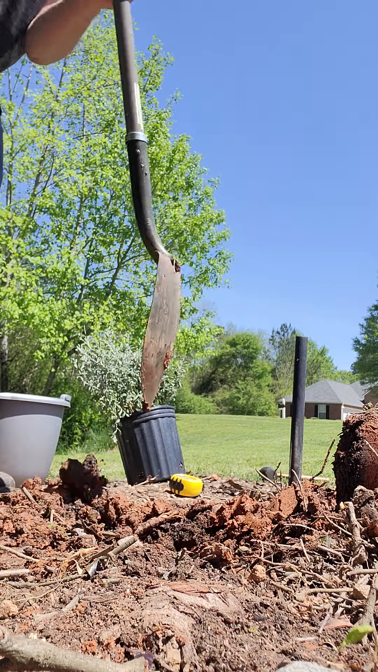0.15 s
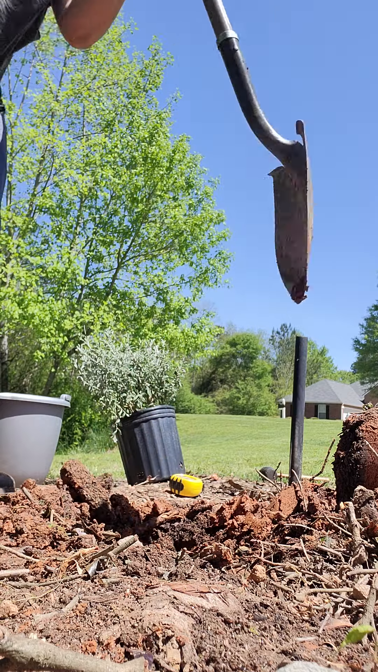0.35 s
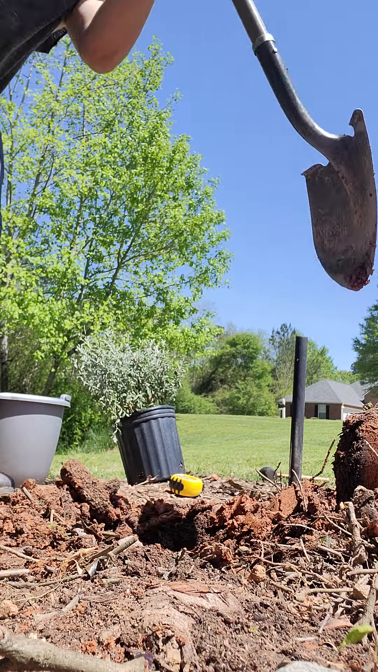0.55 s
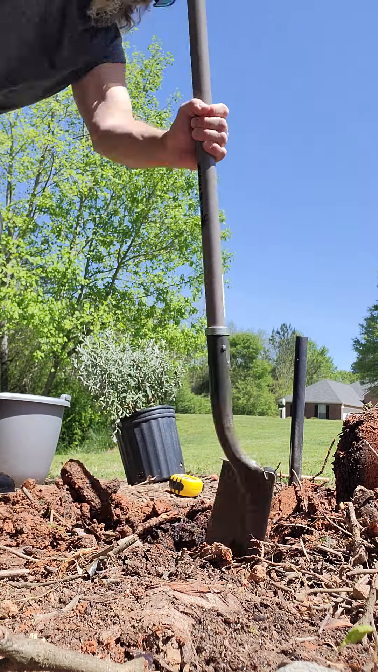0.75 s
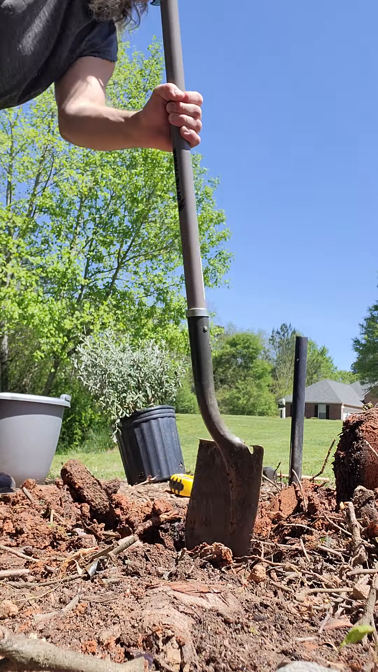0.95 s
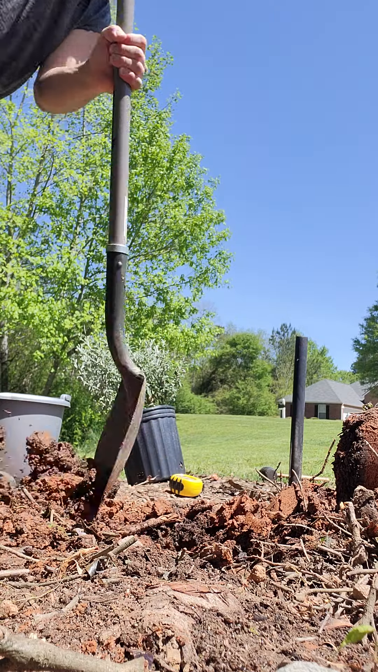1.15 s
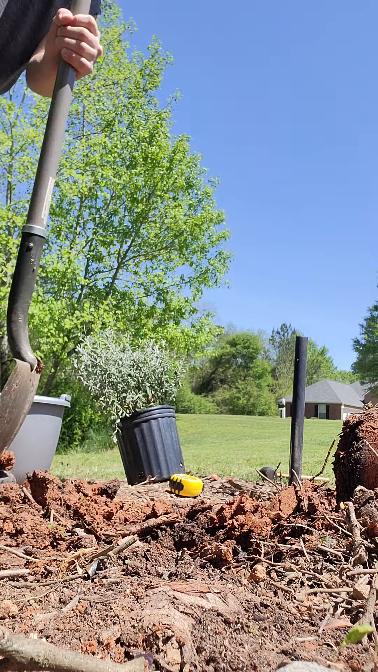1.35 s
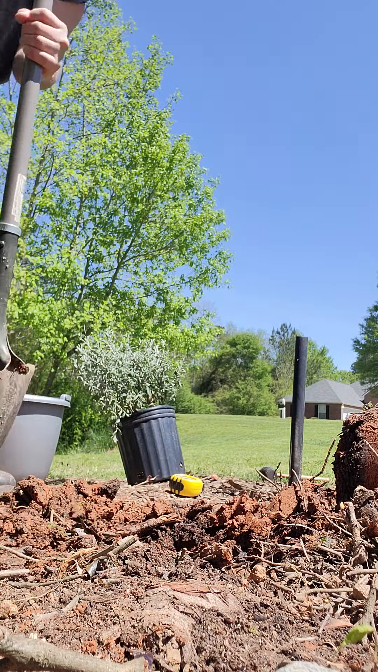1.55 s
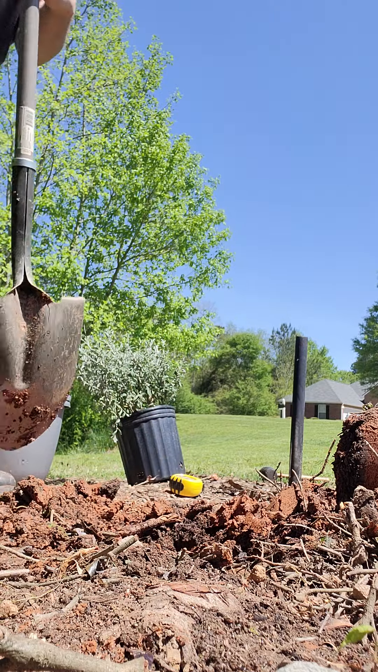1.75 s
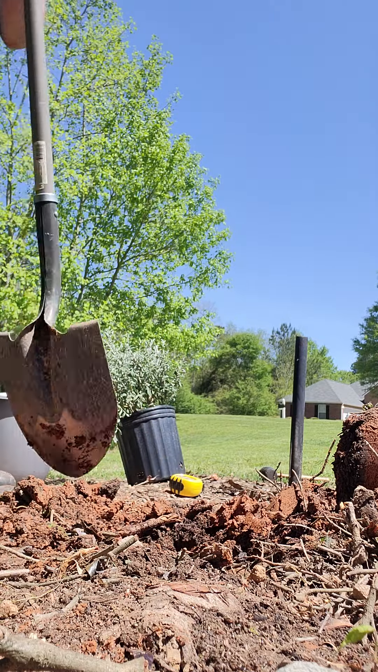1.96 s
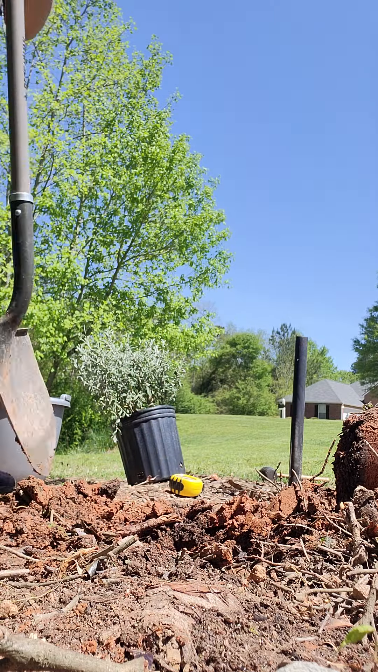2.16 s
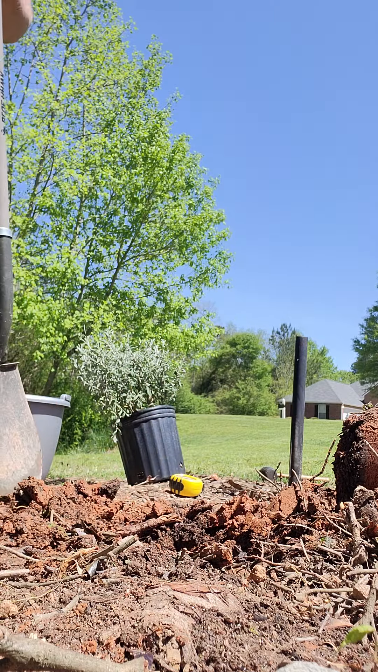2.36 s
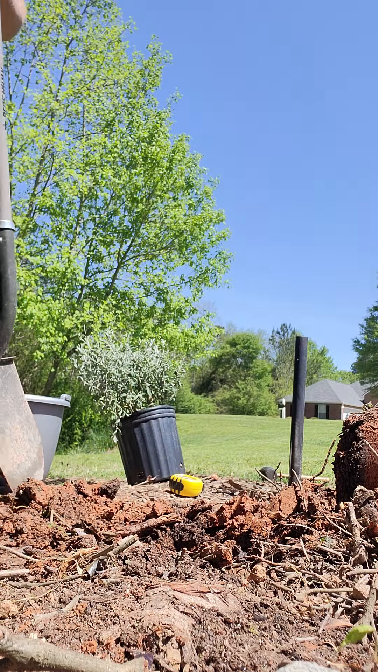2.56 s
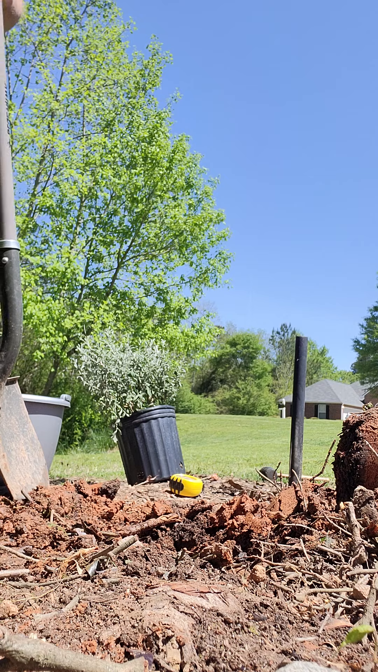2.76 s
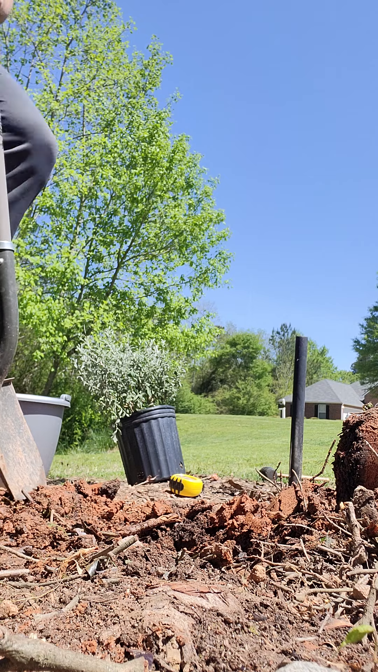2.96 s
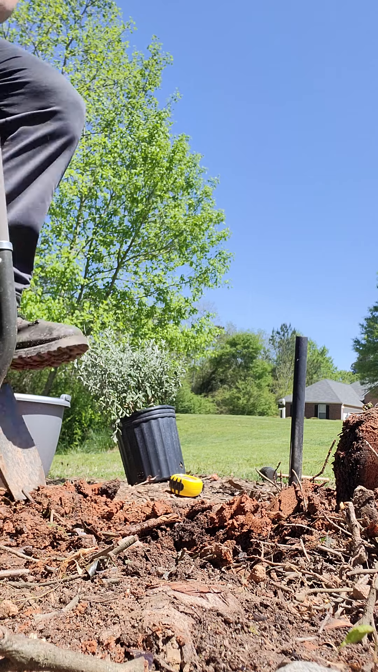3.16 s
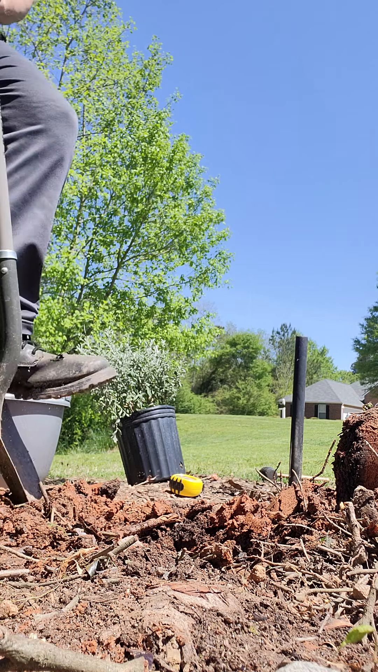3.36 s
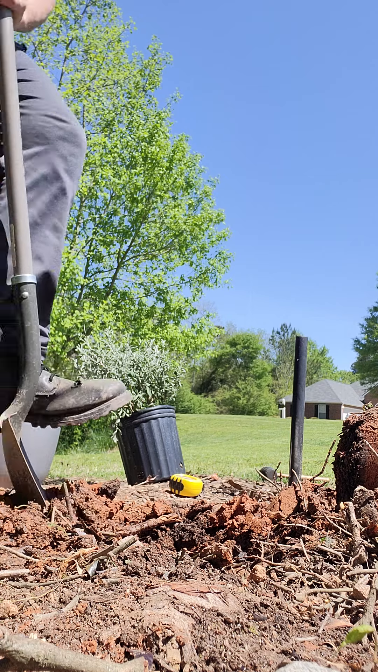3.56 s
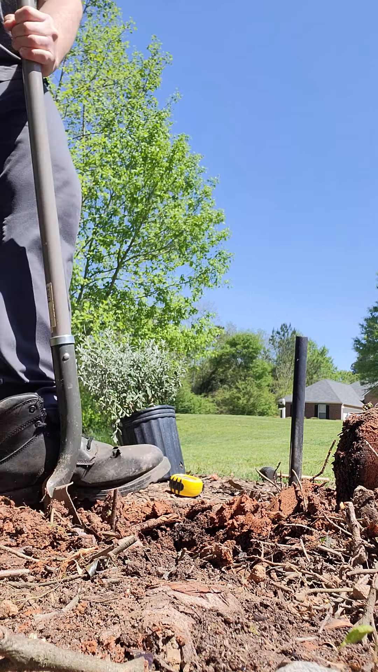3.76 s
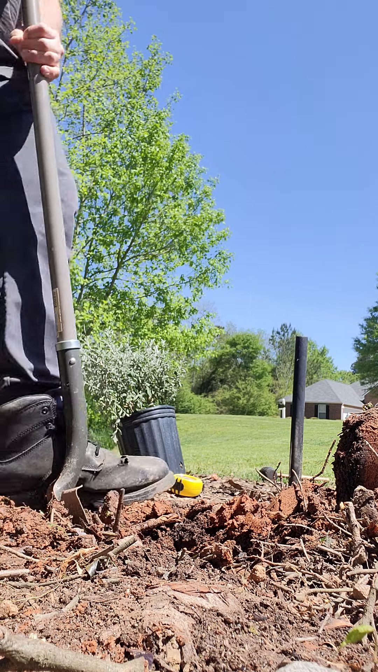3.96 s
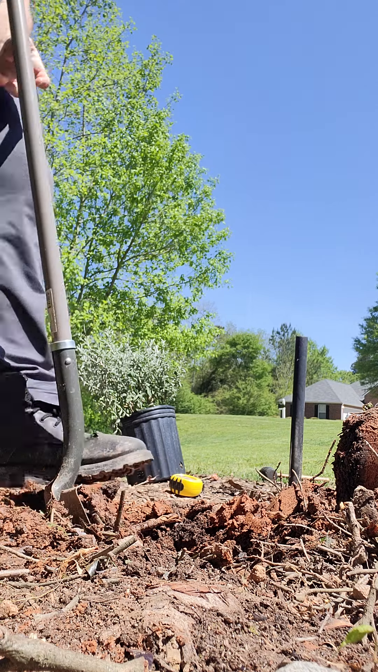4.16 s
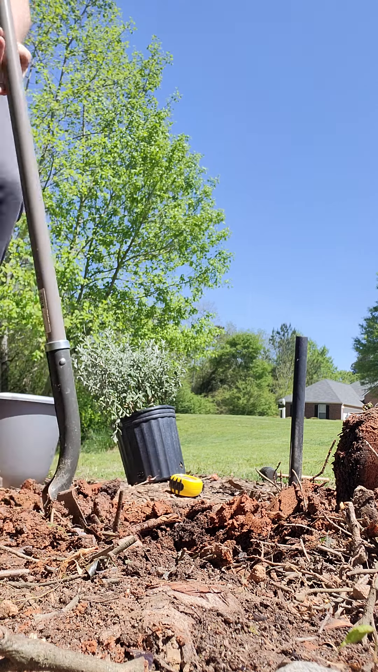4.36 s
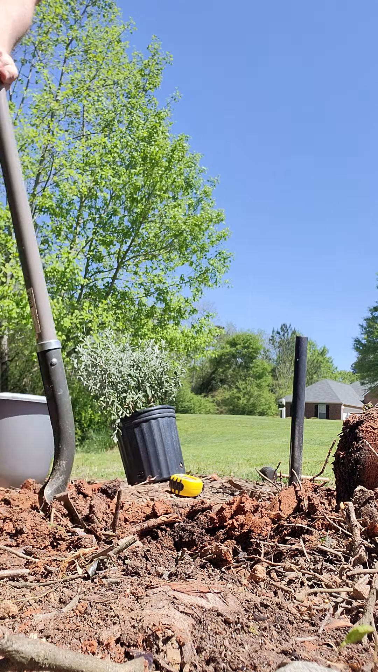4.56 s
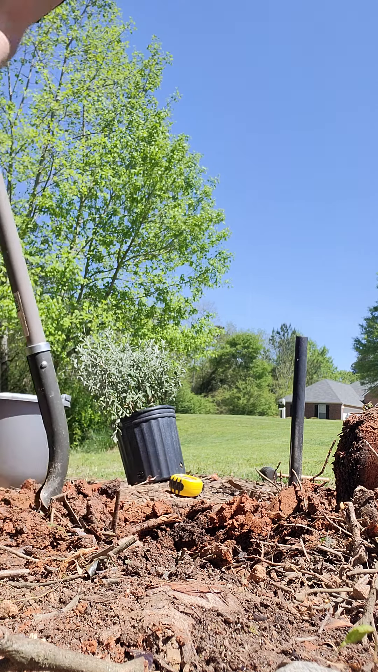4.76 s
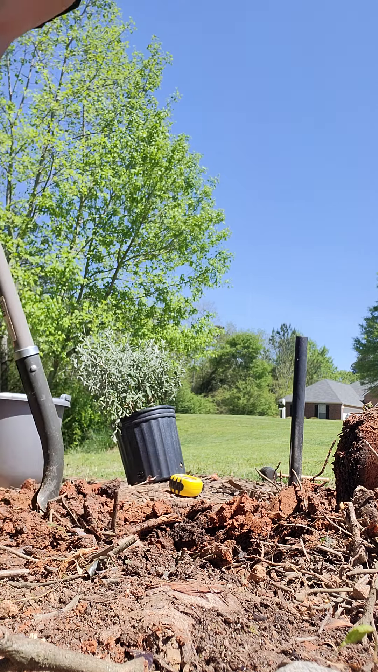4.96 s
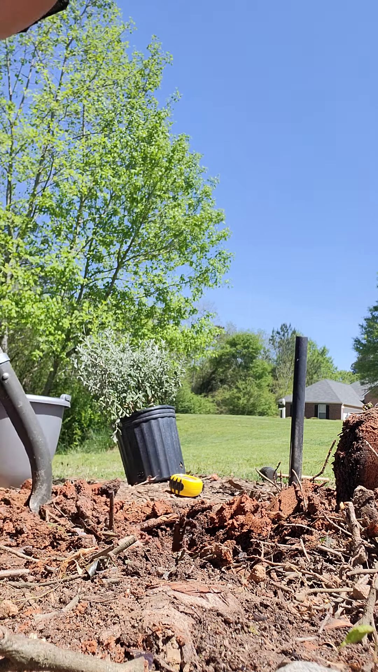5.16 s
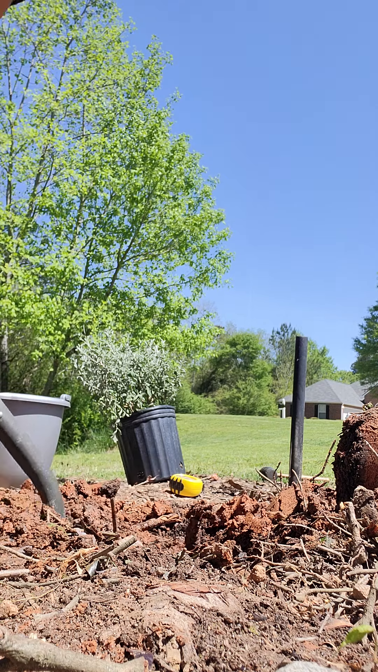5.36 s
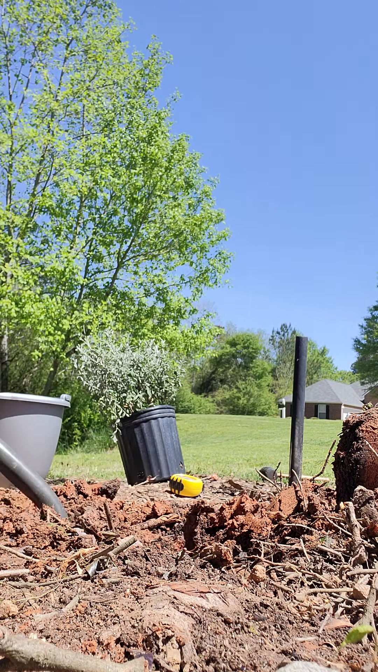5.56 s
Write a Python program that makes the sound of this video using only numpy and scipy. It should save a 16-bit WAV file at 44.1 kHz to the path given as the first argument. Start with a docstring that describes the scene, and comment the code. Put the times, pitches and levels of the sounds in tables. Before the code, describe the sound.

Close, dry, wide stereo digging in an open garden with only a faint outdoor tail. A steady low hum of two distant engines, slowly wavering in pitch and loudness, lies under a soft rumble and very faint leaf hiss. Thin V-shaped bird chirps near 8 kHz recur throughout. Only a faint slide at 0.25 s precedes the loudest event, at about 0.66-0.70 s: a steel spade stabs wet clay with a sharp gritty clank and short thump. Gritty scraping fades to 1.5 s, with a cut and crumble near 1.3 and a snap at 1.5. Soft slides and light edge ticks follow around 1.8-2.6. At 3.2 the blade lands with a dull knock; from 3.46 it is trodden in with a rising scrape, crunch and double thud near 3.7, then two snaps around 3.8. From 4.3 to 5.5 roots crackle and pop irregularly, ending in clustered soft clod knocks at about 5.55.

```python
"""Spade in wet clay, open garden

Close to the two microphone ports, a steel spade is stabbed into wet, gritty clay, lifts a clod,
is set down again, trodden in and levered back through roots. Random grit clicks excite the blade's modes,
filtered grains and damped sines make the clods crumble and knock, noise bursts make the rootlets snap.
Far off, two engines hum as sine tones over shaped noise, and a small bird chirps in gliding sines near 8 kHz."""
import sys
import numpy as np
from scipy import signal
from scipy.fft import rfft, irfft, next_fast_len
from scipy.io import wavfile

SR = 44100
rng = np.random.default_rng(int(sys.argv[2]) if len(sys.argv) > 2 else 0)


def dump(signal):
    """Clip the signal to [-1, 1] and save it as 16-bit WAV at the path in sys.argv[1]."""
    limited = np.clip(np.atleast_2d(signal).T, -1, 1)
    pcm = np.round(limited * 32767).astype(np.int16)
    wavfile.write(sys.argv[1], SR, pcm)


N = 248233
TIME = np.arange(N) / SR
SIZE = 2 * next_fast_len(N // 2 + SR // 2)  # padded length for filtering
FREQS = np.maximum(np.fft.rfftfreq(SIZE, 1 / SR), 1)
CUTOFF_HZ = 16200  # top of the microphone's range

# Levels in the tables are relative: each source has its own trims, and the microphone colours the sum.

# soil sliding over the blade:
# (time [s], length [s], final level [dB], swell [dB], treble lift [dB])
SOIL_SLIDES = [(.25, 0.082, -64.5, 5, -1), (.70, 0.016, -40, -5.5, -11.5), (.85, 0.19, -41.5, 17.5, -1.5),
               (1.15, 0.32, -54, 7, -9), (1.505, 0.077, -48, 2, -7), (1.77, .16, -56, 11.5, 3),
               (2.418, .03, -53.5, 4, -6), (3.23, 0.33, -49.5, 11, 3.5), (3.46, .24, -34, 9, 3.5),
               (3.78, 0.091, -54.5, -12.5, 5), (3.98, 0.13, -52, 11.5, -0.5)]
# quick cuts of the blade's edge:
# (time [s], length [s], final level [dB], swell [dB], treble lift [dB])
EDGE_CUTS = [(.657, 0.024, -21.5, 15, -12), (.687, 0.0075, -13.5, 0.5, -12), (1.272, 0.015, -47, 8, 4),
             (1.345, 0.053, -32.5, 30, 6.5), (2.243, 0.05, -41, -10.5, 3), (2.582, 0.048, -39.5, -8, 2.5),
             (3.212, 0.043, -38.5, 3, -3), (3.4645, .003, -31.5, -9, -1), (3.602, 0.0067, -31.5, 14, 7),
             (3.648, .03, -32.5, -7, -4)]
# ringing of the blade, damped by the soil: (frequency [Hz], width [Hz], level [dB])
BLADE_MODES = [(1760, 95, 0), (2305, 130, -2), (2820, 18, -10.5), (3160, 52, 2), (3350, 94, 5),
               (3770, 81.5, -6.5), (4220, 430, 1), (4820, 84, 7), (5100, 150, 2.5), (5980, 31, -13),
               (6700, 21, -13.5), (7370, 66, -22), (12300, 82, -15.5)]
# colour of grit on steel: (frequency [Hz], level [dB])
GRIT_COLOUR = [(200, -21.5), (700, 8), (1400, -5), (2200, -1), (3500, -4), (5600, -4), (7500, 1.5),
               (10000, 1), (13000, 1), (16000, -11.5)]


def blade_scrape(ring_db=1.5, slide_t60=0.19, cut_t60=0.038, treble_hz=8000, treble_db=0.5,
                 slide_db=-1.5, cut_db=-2.0, pebble_db=-5.5):
    """Grit cracks against the steel: heard directly and through the blade's modes, with a treble of its own."""
    slide, slide_treble = pushes(SOIL_SLIDES, slide_t60)
    cut, cut_treble = pushes(EDGE_CUTS, cut_t60)
    coarse = from_db(pebble_db) * pebbles()

    slide_grit = grains(per_s=4000, spread_db=4.5, clump_db=4.5, clump_hz=71)
    sliding = from_db(slide_db) * shifting(slide_grit + coarse, depth=0.12, rate_hz=28)
    # a fast edge meets more grit
    cut_grit = grains(per_s=18000, spread_db=1.5, clump_db=1.5, clump_hz=200)
    cutting = from_db(cut_db) * shifting(cut_grit + coarse, depth=.25, rate_hz=51)

    body = sliding * slide + cutting * cut
    treble = sliding * slide_treble + cutting * cut_treble

    modes = sum(from_db(db + ring_db) / (1 + 2j * (FREQS - hz) / width) for hz, width, db in BLADE_MODES)
    steel = unit_band(causal(GRIT_COLOUR) * (1 + modes))
    high = 1 / (1 + (treble_hz / FREQS) ** 4)
    return through(body, steel * (1 - high)) + from_db(treble_db) * through(treble, steel * high)


def pushes(rows, t60):
    """Summed envelopes of a table of strokes: for the body of the sound, and for its treble."""
    body_power = treble_power = 0
    for s, length, db, swell_db, lift_db in rows:
        power = stroke(s, length, db, swell_db, t60) ** 2
        body_power = body_power + power
        treble_power = treble_power + power * from_db(lift_db) ** 2
    return np.sqrt(body_power), np.sqrt(treble_power)


def stroke(start, length, db, swell_db, t60, bite_share=0.14):
    """Envelope of one push: a quick bite, a steady swell or easing to its final level, a release."""
    envelope = np.zeros(N)
    sounding = slice(int(start * SR) + 1, int((start + length + 2 * t60) * SR))
    age = TIME[sounding] - start
    swell = swell_db * np.maximum(1 - age / length, 0)
    release = 60 * np.maximum(age - length, 0) / t60
    bite = np.minimum(age / (bite_share * length), 1)
    envelope[sounding] = bite * from_db(db - swell - release)
    return envelope


def grains(per_s, spread_db, clump_db, clump_hz, ground_db=6.0, ground_s=0.0045):
    """Random tiny stick-slip fractures in clumps, plus a scatter off rough ground unlike at each port."""
    clumps = from_db(clump_db * np.clip(drift(clump_hz), -1.5, 1.5))
    clicks = random_clicks(per_s, spread_db) * clumps
    # the scatter is noise that follows the recent power of the clicks
    keep = np.exp(-1 / (ground_s * SR))
    recent_power = signal.lfilter([1 - keep], [1, -keep], clicks ** 2 + 1e-18)
    scattered = np.sqrt(recent_power) * rng.standard_normal((2, N))
    return rms_one(off_centre(clicks) + from_db(ground_db) * scattered)


def pebbles(per_s=110, cycles=3, spread_db=1.5, count=14):
    """Coarse grains tick at random, each size class as a short resonance at its own pitch; unit power."""
    out = 0
    for hz in np.geomspace(1600, 14000, count):
        radius, angle = np.exp(-hz / (cycles * SR)), 2 * np.pi * hz / SR
        resonance = [1, -2 * radius * np.cos(angle), radius * radius]
        ticks = random_clicks(per_s, spread_db) + 1e-18
        out = out + signal.lfilter([np.sin(angle) * hz / SR], resonance, ticks)
    return off_centre(rms_one(out))


def random_clicks(per_s, spread_db):
    """Single-sample clicks of random moment, size and sign."""
    sizes = from_db(spread_db * np.minimum(rng.exponential(1, N), 3)) * rng.choice([-1, 1], N)
    return (rng.random(N) < per_s / SR) * sizes


def shifting(x, depth, rate_hz, count=4):
    """The colour wanders as the contact moves: very short reflections fade in and out at random."""
    lags = (rng.uniform(.0002, .002, count) * SR).astype(int)
    reflections = sum(drift(rate_hz) * np.roll(x, lag, axis=-1) for lag in lags)
    return rms_one(x + depth * reflections)


# pulls on the handle that lever the spade back through the roots:
# (time [s], length [s], final crackle level [dB], swell [dB])
ROOT_PULLS = [(4.328, 0.5, -60.5, -3), (4.955, 0.24, -51.5, 10.5), (5.225, 0.071, -42.5, 1),
              (5.311, .19, -41, 9), (5.544, 0.067, -46.5, -8)]
# the thicker rootlets snapping: (time [s], level [dB], body level [dB], pitch [Hz])
ROOTLET_SNAPS = [(1.202, -43, 1, 3330), (1.519, -30.5, -5, 4400), (3.1832, -40.5, -6, 1717),
                 (3.7836, -26, 0, 6700), (3.8336, -26.5, -0.5, 1690), (4.3302, -29.5, 4, 4516),
                 (4.512, -24.5, 0, 4700), (4.612, -41.5, 6.5, 1680), (4.7463, -35, -12, 3300),
                 (4.791, -27, 5.5, 1820), (4.9562, -36.5, 1.5, 2190), (4.9892, -33.5, 1.5, 2180),
                 (5.035, -33.5, 2.5, 1870), (5.153, -33, 6, 3150), (5.2252, -35, 4, 3600),
                 (5.417, -24, -28, 6400), (5.4886, -27, 4, 3250)]
# colour of tearing fibres: (frequency [Hz], level [dB])
TEAR_COLOUR = [(200, -6), (700, 6), (1500, 3), (2500, 2), (4200, -3), (6000, -4.5), (9000, -2),
               (12000, -2.5), (16000, -13)]
# colour of the crack of a snap: (frequency [Hz], level [dB])
CRACK_COLOUR = [(1500, -21), (4000, 1.5), (7000, -1), (12000, 3), (16000, -6.5)]
# colour of the body of a snap: (frequency [Hz], level [dB])
BODY_COLOUR = [(200, 8), (1200, 4), (2500, -2), (4200, 5), (7000, -6.5), (16000, -62.5)]


def roots(tear_db=0.5, snap_db=-4.0, twang_db=-7.5, pull_t60=0.1):
    """Fibres tear in a lumpy crackle; rootlets part with a snap, each with its own body and a brief pitch."""
    pull = sum(stroke(s, length, db + tear_db, swell_db, pull_t60) for s, length, db, swell_db in ROOT_PULLS)
    fibres = grains(per_s=3500, spread_db=6, clump_db=4.5, clump_hz=80)
    tear = pull * shifting(fibres, depth=0.26, rate_hz=18)

    splinters = grains(per_s=20000, spread_db=1, clump_db=0, clump_hz=400)
    crack = body = twang = 0
    for s, db, body_db, hz in ROOTLET_SNAPS + fine_snaps():
        parting = from_db(db + snap_db) * snap(s)
        crack = crack + parting
        body = body + from_db(body_db) * parting
        twang = twang + from_db(db + body_db + twang_db) * swing(s, hz, 0.019)

    tearing = through(tear, unit_band(causal(TEAR_COLOUR)))
    cracking = through(splinters * crack, causal(CRACK_COLOUR))
    thickness = through(splinters * body, causal(BODY_COLOUR))
    return tearing + cracking + thickness + off_centre(twang)


def fine_snaps(per_pull=3, level_db=-46.5, spread_db=7, body_db=-10, centre_hz=2320):
    """Thin rootlets part at random moments of each pull; rows like those of the thicker ones."""
    rows = []
    for s, length, _, _ in ROOT_PULLS:
        for when, size, pitch in rng.random(size=(per_pull, 3)):
            db = level_db + spread_db * (2 * size - 1)
            hz = centre_hz * 2 ** (pitch - .5)  # within half an octave either way
            rows.append((s + length * when, db, body_db, hz))
    return rows


def snap(start, build_s=0.0014, hold_s=0.0012, t60=0.025):
    """Envelope of a parting rootlet: the first fibres give, the rest follow at once, and the sound dies."""
    envelope = burst(start - build_s, build_s + hold_s, t60)
    building = slice(int((start - build_s) * SR), int(start * SR))
    envelope[building] *= (1 - (start - TIME[building]) / build_s) ** 2
    return envelope


# clay crumbling, low where it is packed and high where it is loose:
# (time [s], level [dB], length [s], pitch [Hz])
CLAY_CRUNCHES = [(0.688, -20, 0.012, 1500), (0.704, -46, 0.036, 2200), (1.351, -45.5, 0.039, 2900),
                 (1.383, -41, 0.016, 2450), (2.256, -61, 0.044, 2750), (3.601, -37, 0.035, 810),
                 (3.663, -29.5, 0.017, 1110), (3.69, -29.5, 0.041, 766), (3.778, -37, .025, 780),
                 (5.223, -39, 0.035, 516), (5.231, -41, 0.063, 2010), (5.338, -44.5, 0.092, 428),
                 (5.417, -37.5, 0.079, 476), (5.543, -31.5, 0.07, 460)]
# dull blows of blade, boot and clods: (time [s], level [dB], pitch [Hz], fall by 60 dB [s])
DULL_BLOWS = [(.661, -14, 504, 0.0067), (.689, -12, 1124, 0.015), (.694, -17.5, 209, 0.061),
              (0.696, -14, 78.6, 0.079), (3.200, -20, 644, 0.029), (3.204, -24.5, 241, 0.088),
              (3.698, -16, 826, 0.031), (3.716, -13.5, 730, 0.025), (5.554, -17, 517, 0.02),
              (5.561, -14, 593, 0.02), (5.577, -18.5, 620, 0.017), (5.592, -22.5, 264, 0.031)]


def clay(crunch_db=0.0, thud_db=0.0, crumble=0.33, spread=1.434):
    """Wet lumps crumble in soft grains around one pitch; each blow is a short, rough, heavily damped swing."""
    crumbs = grains(per_s=2700, spread_db=0.5, clump_db=6.0, clump_hz=90.2, ground_db=-3.5)
    crunching = 0
    for s, db, length, hz in CLAY_CRUNCHES:
        low, high = hz / spread, min(hz * spread, CUTOFF_HZ)
        lump = signal.butter(2, [low, high], "band", fs=SR, output="sos")
        # a narrow band passes less power, so it is raised
        gain = from_db(db + crunch_db) * np.sqrt(SR / 2 / (high - low))
        crunching = crunching + signal.sosfilt(lump, crumbs * (gain * burst(s, length, 0.041) + 1e-12))
    blows = sum(from_db(db + thud_db) * swing(s, hz, t60) for s, db, hz, t60 in DULL_BLOWS)
    return crunching + off_centre(blows * (1 + crumble * drift(900)))


def swing(start, hz, t60):
    """A damped sine set off by a blow."""
    out = burst(start, 0, t60)
    sounding = out > 0
    out[sounding] *= np.sin(2 * np.pi * hz * (start - TIME[sounding]))
    return out


def burst(start, length, t60):
    """Envelope that holds for a moment and dies away."""
    envelope = np.zeros(N)
    sounding = slice(int(start * SR), int((start + length + 2 * t60) * SR))
    envelope[sounding] = from_db(-60 * np.maximum(TIME[sounding] - start - length, 0) / t60)
    return envelope


def off_centre(x, lag=13):
    """The spade works to one side, so the left port hears it a little later (lag in samples)."""
    return np.array([np.pad(x, (lag, 0))[:N], x])


# bird calls: (time [s], level [dB], pitch at the bottom of the dip [Hz])
BIRD_CALLS = [(-.02, -48.5, 7600), (0.244, -49.5, 8280), (.37, -59.5, 8100), (0.591, -59, 8450),
              (0.841, -52, 7970), (1.091, -53, 8400), (1.226, -53.5, 7970), (1.865, -55, 8640),
              (2.0, -49, 8094), (2.35, -62, 8280), (2.715, -45, 8287), (2.949, -47.5, 8270),
              (3.075, -45, 7930), (3.885, -46, 8160), (4.308, -56, 8404), (4.449, -59, 8300),
              (4.54, -47.5, 8740), (4.67, -47.5, 8200), (5.019, -62, 8350), (5.165, -53, 8140)]


def bird(start_hz=8800, fall_s=0.011, rise_s=0.045, overshoot=0.72, warble_hz=70,
         direct_db=-7.5, leaves_db=6.0, pan_db=1.0):
    """Thin V-shaped whistles, smeared by the foliage; the deeper the dip, the higher the call ends."""
    pitch, level = np.full(N, float(start_hz)), np.zeros(N)
    for s, db, bottom_hz in BIRD_CALLS:
        turns = [s, s + fall_s, s + fall_s + rise_s]
        end_hz = start_hz + overshoot * (start_hz - bottom_hz)
        glide = np.interp(TIME, turns, [start_hz, bottom_hz, end_hz])
        pitch = np.where(TIME >= s, glide, pitch)
        level += from_db(db) * np.interp(TIME, turns, [0, 1, 0])
    song = level * np.sin(2 * np.pi * np.cumsum(pitch + warble_hz * drift(300)) / SR)
    smeared = scatter(song, t60=0.2, delay=0.0018, dull_hz=14970)
    return (from_db(direct_db) * song + from_db(leaves_db) * smeared) * from_db([[pan_db], [-pan_db]])


# first far engine, its speed: (time [s], speed [cycles per s])
FIRST_ENGINE_SPEED = [(0, 19.1), (.5, 19.1), (.9, 18.3), (1.7, 18.45), (2.7, 20), (3.4, 20.15),
                      (4.5, 18.15), (5.63, 17.45)]
# its loudness: (time [s], level [dB])
FIRST_ENGINE_LEVEL = [(0, -47.5), (.5, -38.5), (.9, -47), (1.7, -44), (2.4, -39), (3.3, -40.5), (4.3, -35),
                      (4.8, -36), (5.63, -42.5)]
# its strongest orders: (multiple of the speed [1], level [dB])
FIRST_ENGINE_ORDERS = [(4, -1.5), (5, -0.5), (10, -14)]
# second far engine: (time [s], firing frequency [Hz], level [dB])
SECOND_ENGINE = [(0, 116.6, -46), (.25, 117.8, -41), (.55, 131, -31.5), (.75, 130.1, -41.5),
                 (1.7, 132.5, -45.5), (1.9, 134.1, -37), (2.15, 131.5, -36), (2.45, 119, -43.5),
                 (3.3, 115.8, -33.5), (3.55, 114.1, -51.5), (5.63, 114, -44)]


def engines(waver_db=1.5, hum_db=0.0):
    """Far off, only low orders carry: three sines share one engine's speed and level, one is the other's."""
    speed_hz, = in_time(FIRST_ENGINE_SPEED)
    engine_db, = in_time(FIRST_ENGINE_LEVEL)
    tones = [(order * speed_hz, engine_db + db) for order, db in FIRST_ENGINE_ORDERS]
    tones.append(in_time(SECOND_ENGINE))
    hum = 0
    for hz, db in tones:
        gain = from_db(db + hum_db + waver_db * drift(5))  # each tone wavers by itself
        turns = np.cumsum(hz) / SR + rng.random()
        hum = hum + gain * np.sin(2 * np.pi * turns)
    return np.sqrt(2) * hum


# rush of the far engines: (time [s], level [dB])
ENGINE_RUSH = [(0, -49), (.6, -44), (1.0, -48), (1.7, -49), (2.3, -44.5), (5.0, -45), (5.63, -48)]
# hiss of the leaves: (time [s], level [dB])
LEAF_HISS = [(0, -83), (.6, -85), (.9, -73.5), (1.7, -70), (2.8, -70.5), (3.9, -66.5), (5.63, -70)]
# colour of the rumble: (frequency [Hz], level [dB])
RUMBLE_COLOUR = [(15, -29.5), (30, -15), (45, -4.5), (62, 4), (90, -2), (130, 1.5), (160, -6), (210, -5.5),
                 (300, -25), (600, -55)]
# colour of the rush, dulled by distance: (frequency [Hz], level [dB])
RUSH_COLOUR = [(120, -9.5), (200, 3), (260, -0.5), (390, -7), (600, -9), (780, -7), (1200, -16),
               (2000, -29.5), (3200, -42), (5000, -59), (16000, -79.5)]
# colour of the leaves: (frequency [Hz], level [dB])
LEAF_COLOUR = [(1000, -18), (3500, 3.5), (6000, 4.5), (8500, 4), (11500, 3.5), (13000, -7), (16000, -23)]


def far_noise(rumble_db=-39.0, rumble_follows=.6, rush_low_hz=230):
    """Rumble and rush of the engines swell together, dulled by distance; the leaves hiss faintly."""
    rush_db, = in_time(ENGINE_RUSH)
    hiss_db, = in_time(LEAF_HISS)
    swell_db = rumble_follows * (rush_db - rush_db.mean())
    rumble = from_db(rumble_db + swell_db) * wide_noise(from_db(over_hz(RUMBLE_COLOUR)))
    rush_response = from_db(over_hz(RUSH_COLOUR)) / (1 + (rush_low_hz / FREQS) ** 4)
    rush = from_db(rush_db) * wide_noise(rush_response)
    hiss = from_db(hiss_db) * wide_noise(from_db(over_hz(LEAF_COLOUR)))
    return rumble + rush + hiss


# steady air at the two ports: (frequency [Hz], left-right likeness [-1 to 1])
PORT_LIKENESS = [(60, 0.62), (200, 0.96), (400, 0.66), (700, 0.54), (1300, -0.2), (3000, 0), (16000, 0)]


def wide_noise(response):
    """Stereo noise of unit power, largely alike in the bass and unrelated in the high treble."""
    alike = np.clip(over_hz(PORT_LIKENESS), -1, 1)
    shares = np.sqrt([1 + alike, 1 - alike])
    mid, side = through(rng.standard_normal((2, SIZE)), response * shares)
    return rms_one(np.array([mid + side, mid - side]))


def scatter(x, t60, delay, dull_hz):
    """Diffuse reflections, different at each microphone port; unit energy below the dulling."""
    echoes = rng.standard_normal((2, N)) * burst(delay, 0, t60)
    echoes /= np.sqrt(np.sum(echoes ** 2, axis=1, keepdims=True))
    return through(x, rfft(echoes, SIZE) / (1 + 1j * FREQS / dull_hz))


def drift(rate):
    """Slow chance with a spread of one, wandering below a rate in Hz."""
    return rms_one(through(rng.standard_normal(SIZE), 1 / (1 + (FREQS / rate) ** 4)))


def from_db(db):
    """Decibels to gain."""
    return 10 ** (np.asarray(db) / 20)


def rms_one(x):
    """Scale to unit power."""
    return x / np.sqrt(np.mean(x ** 2) + 1e-20)


def in_time(rows):
    """One curve over time for each column after the first."""
    s, *columns = np.transpose(rows)
    return [np.interp(TIME, s, column) for column in columns]


def over_hz(points):
    """Join points on a log-frequency axis."""
    hz, value = np.transpose(points)
    return np.interp(np.log(FREQS), np.log(hz), value)


def causal(points):
    """Minimum-phase response of a spectrum: nothing sounds before its cause."""
    cepstrum = irfft(np.log(from_db(over_hz(points))))
    cepstrum[1:SIZE // 2] *= 2
    cepstrum[SIZE // 2 + 1:] = 0
    return np.exp(rfft(cepstrum))


def through(x, response):
    """Pass a sound through a frequency response."""
    return irfft(rfft(x, SIZE) * response)[..., :N]


def unit_band(response, low_hz=2000, high_hz=7200):
    """Scale a response by its RMS gain inside a band, averaged over the whole spectrum."""
    inside = (FREQS > low_hz) & (FREQS < high_hz)
    return response / np.sqrt(np.mean(np.abs(response * inside) ** 2))


def scene(garden_db=-14.5):
    """The spade is close by and the garden returns a faint tail; bird and engines are further off."""
    spade = blade_scrape() + roots() + clay()
    garden = scatter(spade[1], t60=0.24, delay=0.0056, dull_hz=5500)
    return spade + from_db(garden_db) * garden + bird() + engines() + far_noise()


# colour of the two microphone ports: (frequency [Hz], left minus right [dB])
PORT_BALANCE = [(60, 0.5), (200, 0.5), (700, -3), (1300, -3.5), (2500, -5), (4500, -3), (8000, 1),
                (15000, -2.5)]


def record(dry):
    """The two ports differ in colour; deep bass is shed, the hardest peaks are rounded, the top is cut."""
    half_each = np.array([[.5], [-.5]])
    ports = through(dry, from_db(over_hz(PORT_BALANCE) * half_each))
    ports = signal.sosfilt(signal.butter(2, 24, "high", fs=SR, output="sos"), ports)
    ports = .75 * np.tanh(ports / .75)
    top_cut = signal.ellip(10, .05, 60, CUTOFF_HZ, fs=SR, output="sos")
    return signal.sosfiltfilt(top_cut, ports)


dry = scene()
out = record(dry)
dump(out)
```